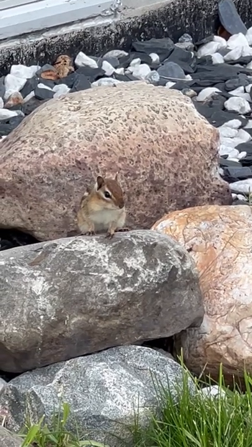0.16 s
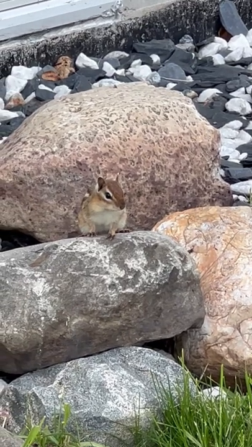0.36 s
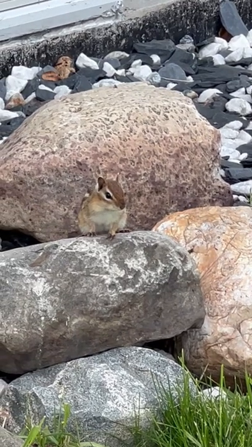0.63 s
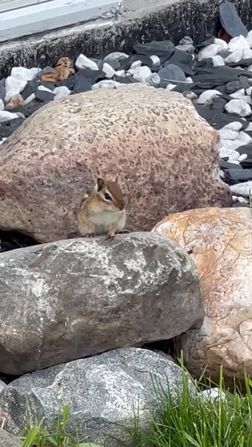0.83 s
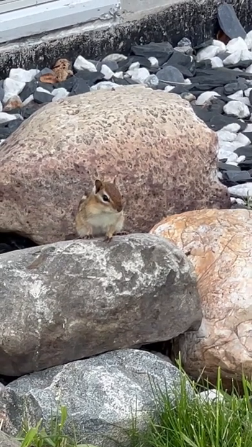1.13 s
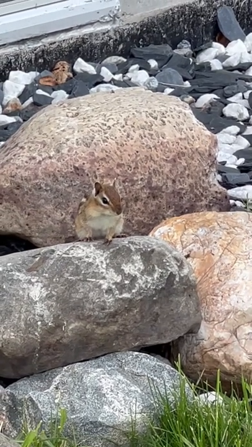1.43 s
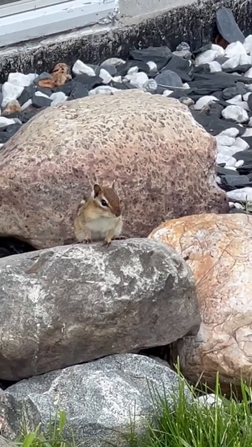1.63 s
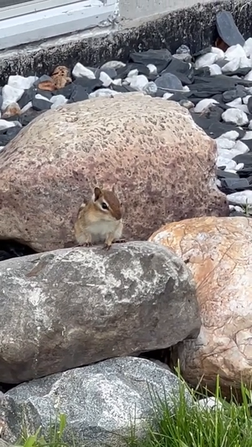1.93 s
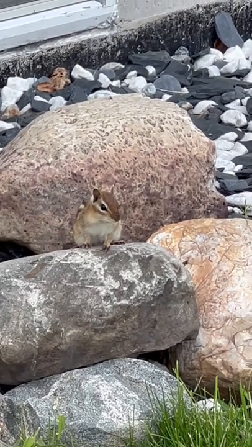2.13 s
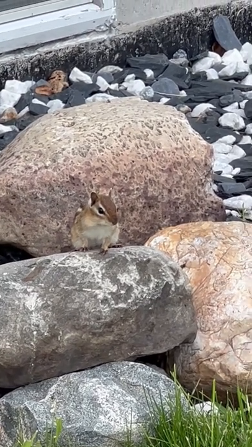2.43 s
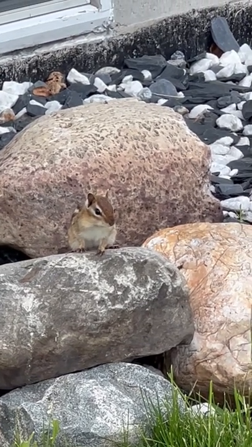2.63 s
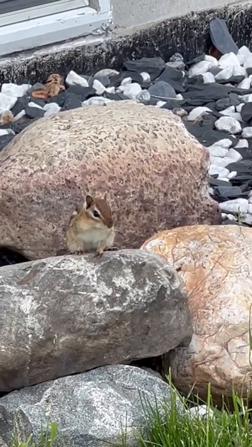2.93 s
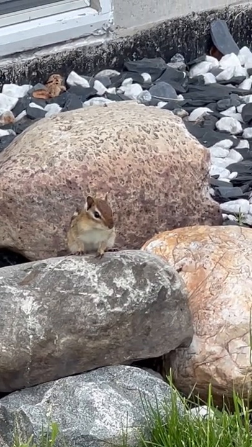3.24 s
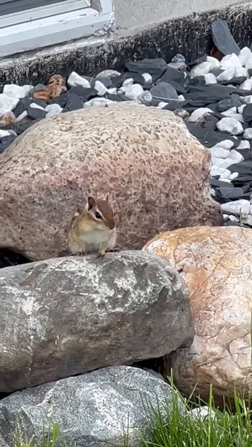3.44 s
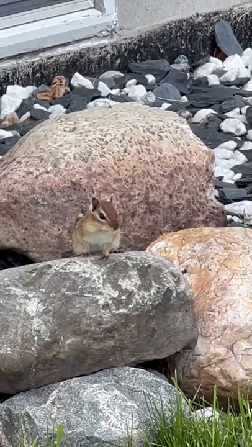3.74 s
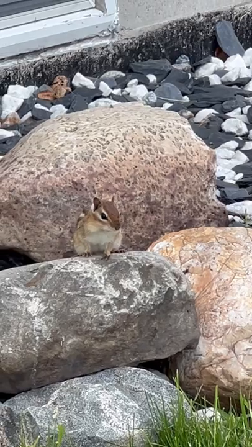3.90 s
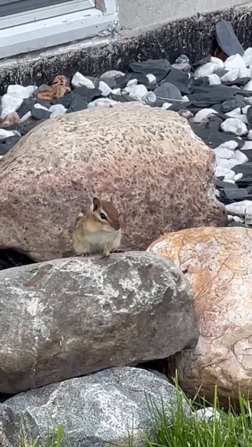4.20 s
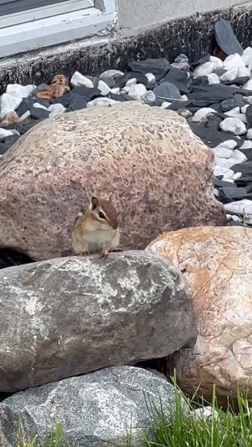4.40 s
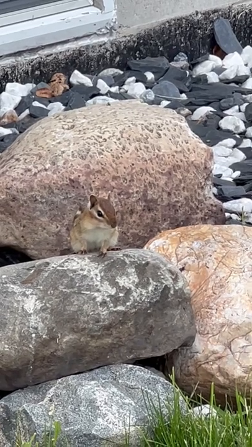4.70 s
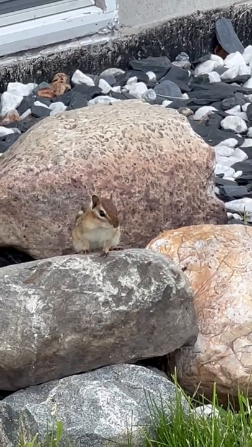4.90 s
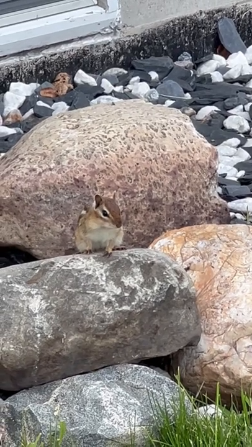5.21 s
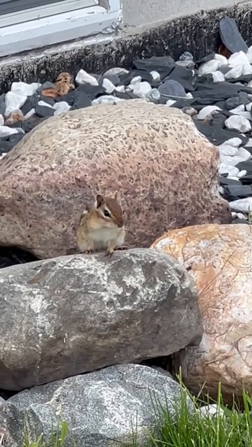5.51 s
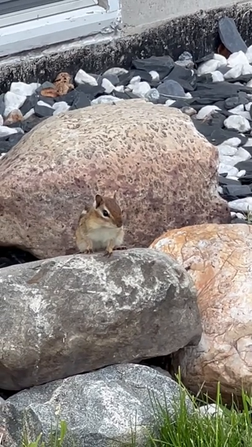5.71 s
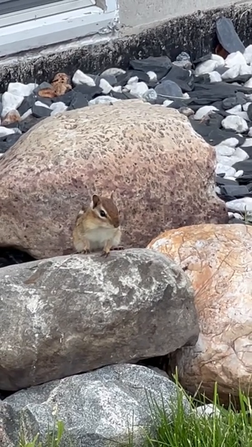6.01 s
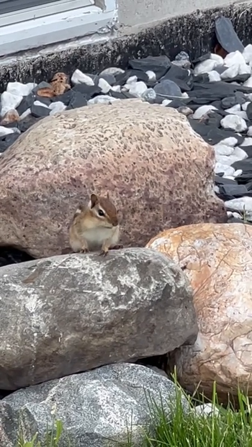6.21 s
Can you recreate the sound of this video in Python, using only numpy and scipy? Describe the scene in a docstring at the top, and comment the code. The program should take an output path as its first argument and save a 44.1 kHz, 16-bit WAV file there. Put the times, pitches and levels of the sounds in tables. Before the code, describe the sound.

Outdoors in a rocky yard, a chipmunk chirps three times, loud, very short and steeply falling, at roughly two-second intervals, each with a tight stony echo. Songbirds are sparse at first, then whistle and trill more busily in the second half. A far dove coos softly. Low traffic rumble, slight wind and airy hiss lie underneath. The microphone is a handheld stereo pair a few metres away.

```python
"""Chipmunk among songbirds

A chipmunk on a pile of rocks gives three sharp chirps: sines falling in pitch, repeated by the rocks.
Songbirds whistle and trill around it on gliding sines; far birds reach us only as echoes.
A distant dove coos on soft low sines, and a few faint ticks are bursts of treble noise.
Behind lie shaped noise for traffic, wind and air, and narrow noise bands for engine tones."""
import sys
import numpy as np
from scipy import signal
from scipy.fft import rfft, irfft, next_fast_len
from scipy.io import wavfile
from scipy.ndimage import uniform_filter1d

SR = 44100
rng = np.random.default_rng(int(sys.argv[2]) if len(sys.argv) > 2 else 0)


def store_wav(level_fs):
    """Save 16-bit WAV to argv[1]."""
    pcm = np.round(np.clip(np.atleast_2d(level_fs), -1, 1) * 32767)
    wavfile.write(sys.argv[1], SR, pcm.T.astype(np.int16))


N = 280035

# The chipmunk's chirps. Each row: start in seconds, length in seconds, top in Hz, bottom in Hz,
# haste of the fall (exponent), level in dB before the mouth colours it, extra punch at the start in dB.
CHIRPS = [(1.7426, 0.038, 7270, 1755, 0.99, -34.5, 3), (4.1453, 0.042, 7780, 2126, 1.02, -32.5, 2),
          (6.2017, 0.038, 7730, 2296, 1.2, -34, 1.5)]
# Shape of the fall. Each row: time in seconds, share of the fall still to come before haste.
CHIRP_FALL = [(0, 1), (.0025, .94), (.005, .82), (.008, .67), (.011, .48), (.017, .34), (.023, .2),
              (.03, .1), (.04, .001)]
# Loudness of the chirp by pitch. Each row: pitch in Hz, gain in dB.
MOUTH = [(1800, -24.5), (2600, -22), (3150, -22), (3900, -11), (4700, 1.5), (5600, -4), (6600, -4),
         (7400, -4)]
# Second harmonic of the chirp against the first. Each row: harmonic in Hz, level in dB.
OCTAVE = [(4000, -20), (7000, -16), (9500, -34), (10900, -30), (11700, -6), (14000, -5), (15200, -9),
          (16000, -12)]
# Weak lower squeak as each chirp starts. Each row: start in seconds, level in dB.
SQUEAKS = [(1.7405, -62), (4.1455, -52), (6.199, -67)]
CHIRP_ATTACK_S, CHIRP_ATTACK_DB, CHIRP_PUNCH_S = .0024, -42, .0045
# Echoes off the rocks. Each row: delay in ms, gain in dB.
ROCKS = [(1.5, -5), (4, 1), (6.5, -12.5), (9.5, -25.5), (13, -13.5), (16, -8), (19.5, -16), (23, -13.5),
         (68, -30)]
# Colour the rocks give. Each row: frequency in Hz, gain in dB.
ROCK_TONE = [(2000, -17.5), (3200, -6.5), (4500, -11), (5800, -6), (7200, 1.5), (9500, 16.5), (13000, -1),
             (16000, -5)]
# Decay of the yard before stretching. Each row: frequency in Hz, time to fall 60 dB in seconds.
YARD = [(2000, 0.7), (4000, 0.46), (7000, 0.33), (9000, 0.18), (14000, 0.29)]
# Faint bright ticks. Each row: start in seconds, level in dB before the treble filter.
TICKS = [(1.671, -66), (4.084, -66), (5.729, -62), (6.139, -70)]

# Gliding whistles. Each row: start in seconds, length in seconds, turn as a share of the note 0-1,
# start in Hz, turn in Hz, end in Hz, start level in dB, turn level in dB (both before the song mix).
WHISTLES = [ (0.121, 0.028, .5, 4150, 4080, 4050, -90, -86), (4.194, .03, .5, 3970, 3490, 3300, -67, -67),
            (0.155, 0.033, 0.83, 4630, 4280, 4190, -79, -71), (1.95, .028, .7, 2620, 2580, 2600, -87, -74),
            (2.2, 0.14, .35, 2660, 2645, 2750, -83, -80),
            (2.31, 0.054, 0.47, 3700, 4160, 4410, -84.5, -74.5),
            (2.335, .032, 0.85, 3350, 3900, 4000, -78, -77),
            (2.39, 0.046, 0.83, 3510, 3290, 3230, -79, -76), (2.58, .12, .8, 3540, 3830, 3850, -81, -81),
            (3.0, .16, 0.15, 2700, 2816, 2950, -68, -76), (3.201, .022, .7, 4150, 4030, 4060, -79, -68),
            (3.216, 0.029, 0.51, 3980, 3260, 3160, -71, -65.5),
            (3.24, .03, 0.33, 3900, 3670, 3650, -67, -61.5),
            (3.39, 0.074, 0.75, 3220, 3320, 3300, -72.5, -63),
            (3.485, 0.059, 0.1, 3120, 3150, 3240, -73, -74),
            (3.563, 0.081, 0.54, 3217, 3293, 3304, -70, -60),
            (3.66, 0.035, 0.86, 8230, 7300, 7300, -74, -75),
            (3.665, 0.05, .4, 3130, 3154, 3190, -75, -69.5),
            (3.765, 0.045, 0.69, 4950, 4620, 4630, -93, -59.5),
            (3.89, 0.27, 0.46, 4480, 3830, 3570, -86, -64), (4.235, 0.073, 0.5, 4940, 4213, 4240, -69, -54),
            (4.355, .05, 0.48, 4350, 4040, 4000, -65, -67.5),
            (4.366, 0.053, 0.68, 4334, 4490, 4150, -68, -58.5),
            (4.406, 0.071, 0.61, 4470, 3550, 3510, -66, -57),
            (4.48, 0.17, 0.21, 2700, 2517, 2936, -59, -58), (4.519, .08, 0.5, 4260, 3480, 3370, -65, -67.5),
            (4.61, 0.18, 0.14, 2480, 2370, 2844, -70, -66.5),
            (4.765, 0.047, 0.78, 3434, 3546, 3590, -60.5, -61),
            (4.805, 0.097, 0.87, 3620, 3598, 3656, -52, -50.5),
            (4.77, 0.11, .5, 2480, 2505, 2680, -76, -71.5),
            (4.941, 0.017, 0.67, 11000, 6520, 9500, -80, -56.5),
            (4.96, 0.011, .35, 9500, 10200, 8800, -71.5, -83),
            (4.91, 0.11, 0.82, 3560, 3454, 3500, -72, -68.5),
            (5.05, 0.12, 0.03, 3535, 3510, 3450, -74, -76),
            (5.147, 0.096, 0.6, 4950, 3750, 3655, -55.5, -53),
            (5.246, 0.054, .65, 3850, 2887, 2920, -51.5, -58.5),
            (5.29, 0.072, 0.32, 3050, 2340, 2308, -58, -62), (5.16, .05, .6, 2700, 2673, 2680, -74, -71),
            (5.307, .073, 0.45, 4700, 3750, 3540, -68.5, -77),
            (5.44, 0.063, 0.4, 2680, 2690, 2740, -71.5, -71), (5.46, .04, 0.52, 2410, 2280, 2210, -74, -74),
            (5.86, 0.049, 0.36, 1950, 1905, 1793, -70, -72),
            (6.25, 0.069, 0.38, 3880, 3730, 3150, -68, -70.5)]
# Level change from turn to end; share of the note over which the turn is rounded.
WHISTLE_FADE_DB, WHISTLE_ROUND = -6, 0.043
# Quick straight falls. Each row: start in seconds, length in seconds, top in Hz, bottom in Hz,
# level in dB before the song mix.
DROPS = [(1.994, 0.023, 9470, 6910, -90.5), (3.803, 0.018, 4420, 3060, -63.5),
         (3.822, .016, 4075, 3600, -63), (3.896, 0.014, 4080, 3200, -67.5), (3.919, .017, 3870, 3270, -68),
         (4.999, 0.016, 3846, 2620, -59), (5.012, 0.016, 3530, 2570, -66), (5.03, .02, 3685, 2250, -63.5),
         (5.401, .03, 3670, 3260, -74), (5.429, 0.057, 4930, 3730, -73.5), (5.97, 0.013, 8500, 6840, -80)]
# High calls that shoot up and sink back. Each row: start in seconds, level in dB at the end foot,
# before the song mix.
HOOPS = [(2.042, -75), (2.101, -72), (6.0, -63.5), (6.06, -61.5)]
HOOP_S, HOOP_TOP_SHARE, HOOP_TOP_DB = .05, .33, -12  # the top is quieter than the end foot
HOOP_START_HZ, HOOP_TOP_HZ, HOOP_END_HZ = 5900, 8530, 5960
# Two voices that dip, then meet. Each row: start in seconds, length in seconds, upper dip in Hz,
# lower dip in Hz, level in dB before the song mix.
PAIRS = [(2.493, .065, 4330, 3720, -72), (2.826, .048, 4500, 3650, -73)]
# Turn as a share of the note, start against the dip, meeting pitch against the upper dip.
PAIR_TURN, PAIR_START, PAIR_MEET, PAIR_OCTAVE_DB = .42, 1.05, 1.03, -17
# Trills, one list each. Each row: time in seconds, centre in Hz, level in dB before the song mix.
TRILLS = [
    [(5.465, 4850, -68), (5.51, 4650, -62.5), (5.56, 4300, -58.5), (5.62, 3840, -56.5), (5.7, 3597, -50.5),
     (5.78, 3360, -56.5), (5.8, 3280, -76)],
    [(5.82, 3453, -72), (5.9, 3126, -64), (5.96, 2920, -72.5)],
    [(5.965, 4750, -69), (6.005, 4520, -56), (6.05, 4110, -52), (6.11, 3237, -51.5), (6.15, 2587, -60),
     (6.2, 2616, -59.5), (6.25, 2340, -67)],
]
# Note settings by centre pitch. Each row, one per trill: first anchor in Hz, second anchor in Hz,
# notes per second at first and second, fall of each note in Hz at first and second,
# break into two halves 0-1. Before its wobble the second trill keeps a steady 99 notes per second,
# each falling 570 Hz.
TRILL_NOTES = [(4820, 3620, 140, 118, 820, 1100, 0.8), (3440, 3800, 160, 99, 750, 570, 0.8),
               (3890, 2800, 203, 63, 250, 1150, 0.33)]

# Bunches of far birds. Each row: start in seconds, length in seconds, lowest pitch in Hz,
# highest pitch in Hz (both a guide that notes scatter around), level in dB before length and echo.
CHORUS = [(0.188, 0.055, 3340, 4630, -76), (0.283, 0.1, 2220, 3520, -92), (0.704, 0.051, 3960, 4840, -85),
          (0.735, 0.076, 3120, 4070, -80), (1.495, 0.042, 3450, 4030, -79.5),
          (2.025, 0.051, 3480, 4540, -85), (2.605, 0.035, 2036, 2720, -77),
          (3.806, 0.068, 2200, 2840, -73.5), (3.955, 0.11, 2290, 2770, -79),
          (4.205, 0.057, 2260, 2870, -79), (5.358, 0.29, 2100, 2774, -85),
          (5.623, 0.088, 5240, 7300, -86.5)]
# Dove coos. Each row: start in seconds, end in seconds, start in Hz, end in Hz,
# level in dB before panning.
COOS = [(1.95, 2.506, 598.6, 611, -81.5), (2.74, 3.28, 468, 463, -81), (3.8, 4.24, 462.6, 457.4, -77),
        (4.88, 5.36, 465.6, 458, -77.5)]

# Traffic rumble spectrum. Each row: frequency in Hz, relative density in dB per Hz.
RUMBLE = [(30, -38), (42, -16.5), (52, 2.5), (94, 3), (113, -13.5), (167, -20), (200, -16), (244, -19.5),
          (282, -20), (330, -27.5), (450, -28), (600, -67)]
# Swell of the lows. Each row: time in seconds, traffic in dB, wind on the microphone in dB,
# both before their trims.
RUMBLE_DB = [(0.0, -51.5, -72), (0.41, -48, -66), (1.59, -53, -78), (1.98, -51.5, -68.5), (3.4, -51.5, -90),
             (6.35, -51, -78.5)]
# Wavering engine tones. Each row: centre in Hz, width in Hz, level in dB before the swell.
HUM = [(105.95, 9, -57.5), (139, 16, -65.5), (192.7, 23, -71.5), (287.5, 16, -78.5)]
# Tyre hiss of a far car. Each row: time in seconds, level in dB.
PASSING = [(0, -90.5), (3.9, -92.5), (4.3, -81), (5.1, -85), (5.35, -75), (5.9, -75), (6.1, -79.5),
           (6.35, -70.5)]
# Spectrum of the air. Each row: frequency in Hz, relative density in dB per Hz.
AIR = [(200, -30.5), (350, -1), (700, -4.5), (1200, -12.5), (1750, -14), (2400, -10.5), (3000, -15),
       (3600, -20), (4900, -26.5), (7400, -28.5), (10200, -37), (12600, -32.5), (14200, -33.5),
       (14800, -45), (15300, -62)]
# How alike left and right are in the washes. Each row: frequency in Hz, likeness -1 to 1.
SAME = [(30, .997), (100, .998), (260, .88), (450, .42), (800, -.2), (1200, .25), (1600, .65), (2000, .93),
        (2500, .995), (4200, .98), (5000, .85), (6000, .98), (7400, .96), (9500, .5), (10500, .5),
        (12600, .96), (14200, .97), (15200, .2)]
# Left louder than right in the washes. Each row: frequency in Hz, difference in dB.
LEAN = [(180, 0), (320, 2.5), (500, .5), (900, -.6), (1800, 0)]
# Lead of the right microphone port over the left. Each row: frequency in Hz, turns of phase.
PORTS = [(4050, 0), (4500, .1), (4750, .2), (5000, .48), (5250, .8), (5500, .93), (5800, 1.), (6700, 1.01),
         (7400, 1.05), (8000, 1.11), (10000, 1.25), (11500, 1.36), (12700, 1.49), (16000, 1.5)]
EDGE_HZ = 16250  # upper band limit


def gain_of(db):
    """Turns decibels into an amplitude factor."""
    return 10 ** (np.asarray(db) / 20)


def evened(x):
    """Scales a sound to an overall rms of 1."""
    return x / np.sqrt(np.mean(x ** 2) + 1e-20)


def read(points, hz):
    """Reads a frequency table along a log pitch axis."""
    f, value = np.transpose(points)
    return np.interp(np.log(hz + 1), np.log(f + 1), value)


def curve(rows, index=1):
    """Draws one column of a timed table across the whole scene."""
    return np.interp(np.arange(N) / SR, [r[0] for r in rows], [r[index] for r in rows])


def add(mix, s, sound):
    """Lays a sound into the mix at s seconds, cut at the end of the mix."""
    part = mix[round(s * SR):][:len(sound)]
    part += sound[:len(part)]


def columns(rows):
    """Start time and every column of a table, sample by sample."""
    s, *rest = np.transpose(rows)
    t = np.arange(s[0], max(s[-1], s[0] + .002), 1 / SR)
    return s[0], [np.interp(t, s, c) for c in rest]


def chance(count, size):
    """Smooth random wobble of rms 1."""
    noise = rng.standard_normal(count)
    return evened(uniform_filter1d(uniform_filter1d(noise, size), size))


def bend(length, turn, start, middle, end):
    """A value that glides from start to a rounded turn and on to end."""
    place = np.arange(0, length, 1 / SR) / length
    straight = np.interp(place, [0, np.clip(turn, .05, .95), 1], [start, middle, end])
    return uniform_filter1d(straight, 1 + round(WHISTLE_ROUND * len(place)), mode="nearest")


def tone(hz, db, edge):
    """A sine along a pitch curve, of rms level db before its ends are softened."""
    wave = np.sin(2 * np.pi * np.cumsum(hz) / SR)
    return np.sqrt(2) * gain_of(db) * wave * signal.windows.tukey(len(hz), edge)


def filtered(x, response):
    """Multiplies the spectrum by response(hz)."""
    size = next_fast_len(x.shape[-1] + 4096)
    spectrum = rfft(x, size) * response(np.fft.rfftfreq(size, 1 / SR))
    return irfft(spectrum, size)[..., :x.shape[-1]]


def fuzzy_tone(hz, width, db):
    """Noise squeezed into a narrow resonant band."""
    noise = rng.standard_normal(N)
    return gain_of(db) * evened(filtered(noise, lambda f: 1 / (1 + ((f - hz) / (width / 2)) ** 2)))


def tail(x, start_ms, stretch, same):
    """Dense stereo echoes, each band dying at its own speed."""
    taps = rng.standard_normal((2, SR // 2))
    taps[1] = same * taps[0] + np.sqrt(1 - min(same, 1) ** 2) * taps[1]
    taps[:, :round(start_ms * SR / 1000)] = 0
    hz, t, z = signal.stft(taps, SR, nperseg=128)
    decay = gain_of(-60 * t / (stretch * read(YARD, hz)[:, None]))
    dying = signal.istft(z * decay, SR, nperseg=128)[1]
    return signal.fftconvolve(x[None], dying / np.linalg.norm(dying[0]), axes=1)[:, :N]


def wash(spectrum, size, patchy_db):
    """Noise of a given spectrum with drifting patches, alike left and right as SAME says."""
    hop, hz = size // 4, np.fft.rfftfreq(size, 1 / SR)
    a, b, c, d, patches = rng.standard_normal((N // hop + 5, len(hz), 5)).T
    patches = uniform_filter1d(patches, size=8, axis=0)
    patches = evened(uniform_filter1d(patches, size=10, axis=1))
    same = np.clip(read(SAME, hz), -1, 1)[:, None]
    left, other = a + 1j * b, c + 1j * d
    z = np.array([left, same * left + np.sqrt(1 - same ** 2) * other])
    z *= gain_of(read(spectrum, hz)[:, None] + patchy_db * patches)
    z *= gain_of(np.array([.5, -.5])[:, None, None] * read(LEAN, hz)[:, None])
    return evened(signal.istft(z, nperseg=size, noverlap=size - hop)[1][:, :N])


def chirps():
    """A whistle falls about two octaves in some 40 ms, with a second harmonic above it."""
    voice = np.zeros(N)
    for s, length, top_hz, bottom_hz, haste, level_db, punch_db in CHIRPS:
        t = np.arange(0, length, 1 / SR)
        to_come = np.clip(np.interp(t, *np.transpose(CHIRP_FALL)), 0, 1) ** haste
        hz = bottom_hz + (top_hz - bottom_hz) * to_come
        attack = CHIRP_ATTACK_DB * np.maximum(1 - t / CHIRP_ATTACK_S, 0)
        punch = punch_db * np.exp(-(t / CHIRP_PUNCH_S) ** 2)
        db = uniform_filter1d(level_db + read(MOUTH, hz) + attack + punch, size=30, mode="nearest")
        db = db + 2.26 * chance(count=len(db), size=35)  # slightly hoarse
        octave = tone(2 * hz, db + read(OCTAVE, 2 * hz), 0.035)
        add(voice, s, tone(hz, db, 0.0495) + octave)
    return voice


def chipmunk():
    """The chirps ring out directly, and the rocks close by repeat and scatter them."""
    voice, taps = chirps(), np.zeros(SR // 10)
    for ms, db in ROCKS:
        taps[round(ms * SR / 1000)] = gain_of(db)
    bounced = filtered(voice, lambda hz: gain_of(read(ROCK_TONE, hz)))
    scatter = gain_of(-3.0) * tail(bounced, 3.7, 0.25, 0.91)
    scatter += gain_of(-22.5) * tail(bounced, 25., 1.2, 1.0)
    # walls farther off answer late and dull
    dull_tone = [(2300, 1), (3300, 7), (4500, -14.5), (6500, -10), (9000, -25.0)]
    dull = filtered(voice, lambda hz: gain_of(read(dull_tone, hz)))
    scatter += gain_of(-21.5) * tail(dull, 45., 0.8, 1.0)
    # rough stone mirrors only the longer waves
    mirrored = filtered(bounced, lambda hz: gain_of(read([(8200, -1.5), (10000, -13.5)], hz)))
    for s, db in SQUEAKS:  # heard directly, without echo
        add(voice, s, tone(np.linspace(5500., 4500., num=220), db, 0.27))
    return voice + signal.oaconvolve(mirrored, taps)[:N] + scatter


def ticks():
    """Short dying bursts of noise, filtered to the treble."""
    out = np.zeros(N)
    decay = gain_of(-60 * np.arange(400) / SR / .02)
    bursts = rng.standard_normal((len(TICKS), 400)) * decay
    for (s, db), burst in zip(TICKS, bursts):
        add(out, s, gain_of(db) * burst)
    bright = [(3000, -24), (5000, 0), (7500, 0), (9000, -22), (12000, -14), (15000, -20)]
    return filtered(out, lambda hz: gain_of(read(bright, hz)))


def notes():
    """Start, pitch and level of every clear note; pairs also sound their octave."""
    for s, length, turn, start_hz, turn_hz, end_hz, start_db, turn_db in WHISTLES:
        hz = bend(length, turn, start_hz, turn_hz, end_hz)
        yield s, hz, bend(length, turn, start_db, turn_db, turn_db + WHISTLE_FADE_DB)
    for s, length, top_hz, bottom_hz, db in DROPS:
        yield s, np.linspace(top_hz, bottom_hz, round(length * SR)), db
    for s, db in HOOPS:
        hz = bend(HOOP_S, HOOP_TOP_SHARE, HOOP_START_HZ, HOOP_TOP_HZ, HOOP_END_HZ)
        yield s, hz, bend(HOOP_S, HOOP_TOP_SHARE, db - 4, db + HOOP_TOP_DB, db)
    for s, length, upper_hz, lower_hz, db in PAIRS:
        level = bend(length, PAIR_TURN, db - 12, db, db)
        for dip_hz in (upper_hz, lower_hz):
            hz = bend(length, PAIR_TURN, PAIR_START * dip_hz, dip_hz, PAIR_MEET * upper_hz)
            yield s, hz, level
            yield s, 2 * hz, level + PAIR_OCTAVE_DB


def whistles():
    """Clear gliding sines with a weak third harmonic where it fits below the band limit."""
    song = np.zeros(N)
    for s, hz, db in notes():
        third_db = db + read([(9500, -58), (10800, -36.0)], 3 * hz)
        third = tone(3 * hz, third_db, 0.13) * (3 * hz < EDGE_HZ)
        add(song, s, tone(hz, db, .25) + third)
    return song


def trills():
    """Quick falling notes, each uneven in pitch and level, along a gliding centre."""
    trill = np.zeros(N)
    uneven = rng.standard_normal((len(TRILLS), 2, 80))
    for rows, law, (size, pitch) in zip(TRILLS, TRILL_NOTES, uneven):
        s, (hz, db) = columns(rows)
        first_hz, second_hz, first_rate, second_rate, first_fall_hz, second_fall_hz, split = law
        rate = np.interp(hz, [second_hz, first_hz], [second_rate, first_rate])
        fall_hz = np.interp(hz, [second_hz, first_hz], [second_fall_hz, first_fall_hz])
        rate = np.clip(rate * (1 + .12 * chance(count=len(rate), size=300)), 1, 250)
        count = np.cumsum(rate) / SR
        place, k = count % 1, count.astype(int)  # place within the note, note number
        shape = (1 - split) * np.sin(np.pi * place) ** 1.2 + split * np.sin(2 * np.pi * place) ** 2
        note_hz = hz + fall_hz * (.5 - place) + 60. * pitch[k]
        add(trill, s, tone(note_hz, db + 3. * size[k], .16) * shape)
    return trill


def songbirds():
    """Whistles and trills, heard directly and in the echo of trees and walls."""
    song, trill = whistles(), trills()
    song *= gain_of(1.9 * chance(count=N, size=150))  # moving air and leaves make the level flutter
    late = np.concatenate([np.zeros(round(0.011 * SR)), song])[:N]  # one strong wall echo
    # the high singer sits farther off
    wet = filtered(song, lambda hz: gain_of(read([(5000, 4), (6000, 5.5)], hz)))
    near = (gain_of(1.5) * (song + trill) + gain_of(-6.5) * late) * gain_of([[.25], [-.25]])
    return near + gain_of(-12.) * tail(wet, 6., 1.2, .93) + gain_of(-4.5) * tail(trill, 2., .8, .95)


def far_birds():
    """Sinking bunches of short falling notes, heard only through their echoes."""
    calls, t = np.zeros(N), np.arange(700) / SR
    draws = rng.random((len(CHORUS), 24, 3))
    for (s, length, low_hz, high_hz, db), bunch in zip(CHORUS, draws):
        note_db = db + 10 * np.log10(length * SR / 8000)  # longer bunches get louder notes
        for place, high, slope in bunch:
            centre_hz = low_hz + (high_hz - low_hz) * (0.65 * (1 - place) + 0.41 * high)
            hz = centre_hz + 40000 * slope * (t.mean() - t)
            add(calls, s + place * length, tone(hz, note_db, 0.883))
    return gain_of(3.) * tail(calls, 1., 1.2, .96)


def dove():
    """Soft low coos from afar, each a gliding sine leaning to the left."""
    out = np.zeros(N)
    for start, end, start_hz, end_hz, db in COOS:
        hz = np.linspace(start_hz, end_hz, round((end - start) * SR))
        add(out, start, tone(hz, db, .4))
    return out * gain_of([[1.5], [-1.5]])


def traffic():
    """Low rumble with a few engine tones, tyre hiss, and puffs of wind below."""
    hum = sum(fuzzy_tone(hz, width, db) for hz, width, db in HUM)
    swell_db = curve(RUMBLE_DB)
    wind_tone = [(15, -19.5), (24, 1.0), (40, 12.5), (48, -7.0), (60, -61)]
    wind = gain_of(curve(RUMBLE_DB, index=2) - 3.5) * wash(wind_tone, 8192, 0.89)
    tyre_tone = [(900, -20), (1200, -2.5), (1650, -2.5), (2000, -30.5)]
    tyres = gain_of(curve(PASSING)) * wash(tyre_tone, 1024, 3.7)
    rumble = gain_of(swell_db - 1.5) * wash(RUMBLE, 4096, 0.74)
    rumble += hum * gain_of(0.76 * (swell_db - swell_db.mean()))  # engines follow the swell
    return rumble + wind + tyres


def air():
    """The wash of leaves and far roads, and a thin steady hiss high in the treble."""
    return gain_of(-71.5) * wash(AIR, 1024, 2.8) + fuzzy_tone(11550, 700, -87.5)


def scene():
    """All sources together, from the chipmunk back to the air."""
    return chipmunk() + ticks() + songbirds() + far_birds() + dove() + traffic() + air()


def record(dry):
    """The two microphone ports differ in phase; then the band limit."""
    side = np.array([[-1], [1]])  # half the phase lead to each port
    ports = filtered(dry, lambda hz: np.exp(1j * np.pi * side * read(PORTS, hz)))
    lowpass = signal.firwin(511, EDGE_HZ, window=("kaiser", 9), fs=SR)
    return signal.oaconvolve(ports, lowpass[None], "same")


dry = scene()
out = record(dry)
store_wav(out)
```